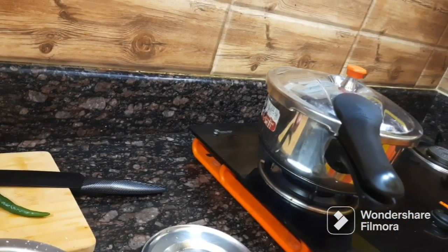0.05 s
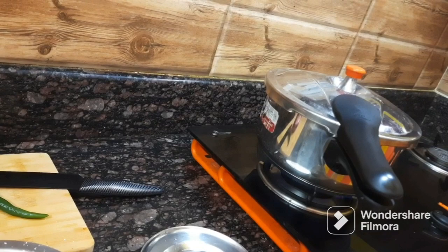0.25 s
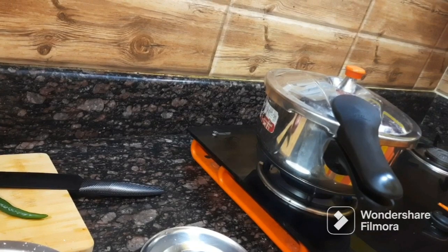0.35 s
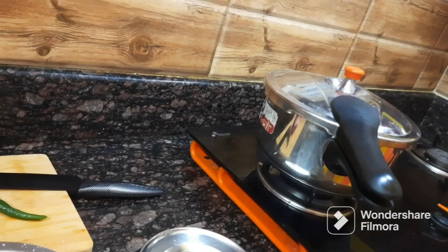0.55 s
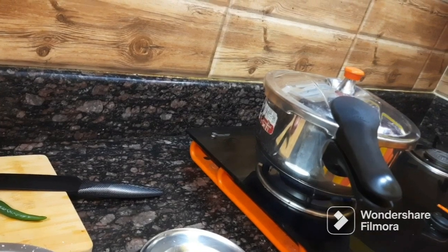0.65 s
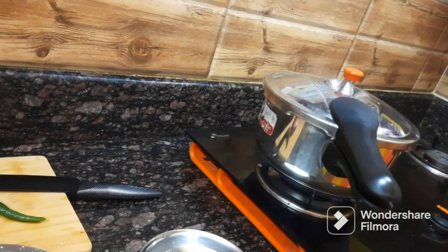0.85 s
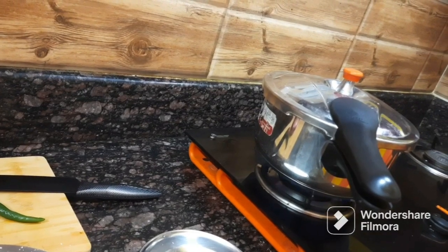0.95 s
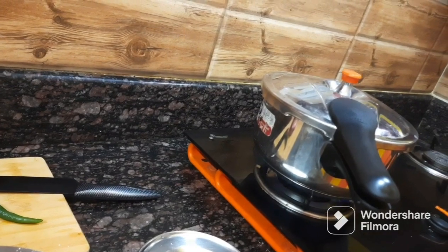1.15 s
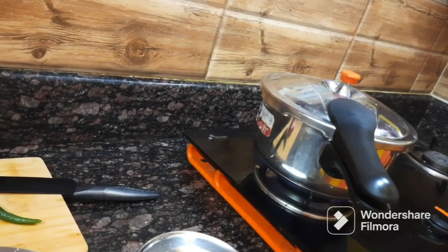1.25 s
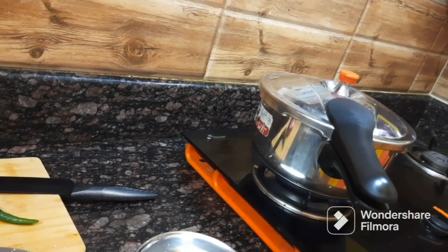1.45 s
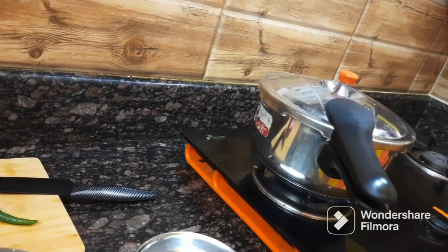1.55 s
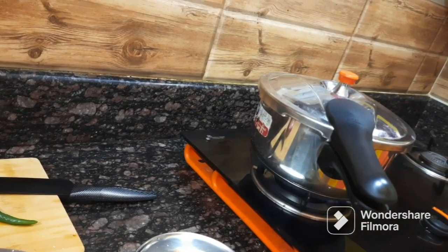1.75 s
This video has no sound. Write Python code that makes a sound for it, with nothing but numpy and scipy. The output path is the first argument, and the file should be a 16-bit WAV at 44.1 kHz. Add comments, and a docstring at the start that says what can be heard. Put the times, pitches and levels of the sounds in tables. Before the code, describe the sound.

A pressure cooker blasts out hissing steam for a second, then stops with a clank.

```python
"""A steam jet roars from the vent of a pressure cooker, on a gas burner in a small tiled kitchen.
Steam first leaks past the weight with a thin whistle; the weight lifts with a chuff, and the turbulent
jet, coloured by the vent's resonances, blows on the left microphone. The weight drops back and
excites the modes of the lid with a clank. Automatic gain control turns down under the blast and holds."""
import sys
import numpy as np
from scipy import signal
from scipy.fft import rfft, irfft
from scipy.io import wavfile
from scipy.ndimage import uniform_filter1d

SR = 44100
rng = np.random.default_rng(int(sys.argv[2]) if len(sys.argv) > 2 else 0)


def bounce(signal):
    """Save signal as a 16-bit WAV file at the path given by the first command-line argument."""
    frames = np.transpose(np.atleast_2d(signal))
    limited = np.clip(frames, -1, 1)
    pcm = np.round(limited * 32767).astype(np.int16)
    wavfile.write(sys.argv[1], SR, pcm)


N = 79380
T = np.arange(N) / SR
PLUME_PARTS = 4  # incoherent regions of the steam plume, one signal row each

# Envelope of the flow through the vent: t/s, relative level/dB
JET_FLOW = [(.05, -55), (.12, -53.5), (.2, -40), (.27, -31.5), (.3, -25.5), (.37, -19), (.45, -19),
            (.62, -18.5), (1.0, -17.5), (1.34, -17), (1.39, -31.5), (1.45, -65.5)]
# Spectrum of the turbulence: f/Hz, relative spectral level/dB
JET_SPECTRUM = [(590, -40), (1000, -20.5), (1900, -17.5), (2450, -11.5), (3650, -7), (4240, -9.5),
                (5400, -5.5), (6790, -6.5), (8060, -4), (9690, -6.5), (12000, -3.5), (13400, -5.5),
                (15000, -13), (15700, -6)]
# Resonances of vent and weight: f/Hz, bandwidth/Hz, gain/dB
VENT_MODES = [(3650, 210, -19), (5040, 1570, -0.5), (7610, 270, -6.5), (8240, 1270, -0.5),
              (14800, 650, 11.5)]
def jet():
    """Turbulence radiates broadband noise, which the resonances of vent and weight filter."""
    noise = hiss(JET_SPECTRUM, flicker_db=0.74, rate_hz=14.4, channels=PLUME_PARTS)
    resonances = sum(amp(db) * ring(noise, hz, width) for hz, width, db in VENT_MODES)
    swell_db = -0.1 * walk(7.5)
    grain_db = 1.5 * walk(400)
    return unit(noise + resonances) * amp(curve(JET_FLOW) + swell_db + grain_db)


# Leak tones: f/Hz, bandwidth per filter pass/Hz, relative peak level/dB, onset t/s, peak t/s
LEAK_TONES = [(8975, 290, -43, 0.044, .23), (4440, 180, -44, .1, 0.36), (7060, 350, -39.5, .17, 0.276)]
def leak():
    """Steam escaping past the weight whistles: narrow-band noise is heard as pitch."""
    noise = rng.standard_normal((PLUME_PARTS, N))
    fade_s = 0.051
    out = 0
    for hz, width, db, onset, peak in LEAK_TONES:
        whistle = unit(ring(ring(noise, hz, width), hz, width))
        envelope_db = curve([(onset - fade_s, -40), (onset, -18), (peak, 0), (peak + fade_s, -40)])
        out += whistle * amp(db + envelope_db)
    return out


# Spectrum of the chuff: f/Hz, relative spectral level/dB
CHUFF_SPECTRUM = [(180, -26), (300, -12.5), (850, -5.5), (1650, -7.5), (3090, -2.5), (5500, -5),
                  (7000, -33), (9000, -68)]
def chuff():
    """Sudden release of pressure as the weight lifts gives a noise burst with Gaussian flanks."""
    lift_s, rise_s, hold_s, fall_s = 0.2955, 0.027, 0.06, 0.043
    t = T - lift_s
    puff = np.exp(-(np.minimum(t, 0) / rise_s) ** 2 - (np.maximum(t - hold_s, 0) / fall_s) ** 2)
    return amp(-32.5) * puff * hiss(CHUFF_SPECTRUM, flicker_db=2.9, rate_hz=37.9, channels=PLUME_PARTS)


# Landing and bounces of the weight: t/s, relative level/dB
IMPACTS = [(1.382, -17.5), (1.42, -32), (1.45, -27)]
# Modes of lid and weight: f/Hz, relative level/dB, decay time T60/s
LID_MODES = [(585, -5, .3), (649, -2, 0.16), (720, 7, 0.045), (794, -2, 0.13), (855, -0.5, .15),
             (1342, -0.5, 0.16), (1360, -0.5, 0.19)]
def clank():
    """Each impact of the weight sets the lid in free vibration, a sum of damped modes."""
    contact_s = 0.0011
    out = np.zeros(N)
    for start, impact_db in IMPACTS:
        t = np.clip(T - start, 0, None)
        phases = rng.uniform(-0.25, 0.49, len(LID_MODES))
        modes = sum(amp(db) * np.sin(2 * np.pi * hz * t + phase) * 1000. ** (-t / t60)
                    for (hz, db, t60), phase in zip(LID_MODES, phases))
        out += amp(impact_db) * np.clip(t / contact_s, 0, 1) * modes / 4
    return out


# Envelope of the air stream: t/s, level/dB
WIND_FLOW = [(.36, -64), (.39, -43.5), (.8, -36), (1.2, -38), (1.36, -39.5), (1.4, -66)]
# Spectrum of its pressure fluctuations: f/Hz, relative spectral level/dB
WIND_SPECTRUM = [(25, -31), (60, -3.5), (130, -6.5), (300, -12), (800, -25.5), (1500, -45)]
# Strongest buffets: t/s, level above the stream/dB
WIND_BUFFETS = [(.405, 9.5), (0.431, 9), (.485, 15.5), (.63, 8), (.725, 4), (.89, 8.5), (1.039, 8),
                (1.077, 7), (1.116, 11.5), (1.15, 6), (1.271, 4)]
def wind():
    """Pseudo-sound: unsteady flow presses on the left microphone; the right one is sheltered."""
    buffet_s = 0.016
    gust_db = sum(db * np.exp(-((T - at) / buffet_s) ** 2) for at, db in WIND_BUFFETS) + 2 * walk(22)
    rumble = hiss(WIND_SPECTRUM, flicker_db=1.5, rate_hz=25, channels=2)
    return rumble * amp(curve(WIND_FLOW) + gust_db) * amp([[0], [-30]])


# Rumble and hiss of the pot: f/Hz, relative spectral level/dB
SIMMER_SPECTRUM = [(24, -26.5), (58, 1.5), (110, -3.5), (200, -3), (500, -27), (2000, -32), (4500, -18.5),
                   (6000, -39), (15500, -43)]
def simmer():
    """Simmering radiates broadband noise, which dies away once the pressure is let off."""
    end_s = 1.436
    envelope_db = curve([(end_s, -51.5), (end_s + .08, -90)])
    return hiss(SIMMER_SPECTRUM, flicker_db=3.7, rate_hz=11) * amp(envelope_db)


# Burner roar and room noise: f/Hz, relative spectral level/dB
KITCHEN_SPECTRUM = [(24, -60), (55, -16), (90, -25), (125, -24), (170, -8), (250, -10), (350, -6),
                    (420, -11), (550, -9.5), (1000, -14), (2400, -16), (4500, -23), (6000, -34.5),
                    (9000, -34.5), (14500, -43), (15500, -42)]
# Standing waves of the kitchen and a faint high hiss: f/Hz, bandwidth/Hz, level/dB
KITCHEN_BANDS = [(173, 31, -55.5), (338.5, 28, -56.5), (13600, 300, -65)]
def kitchen():
    """Burner and room noise form a diffuse field, coherent at the two microphones only in the bass."""
    coherent_below_hz = 564
    mid, side = hiss(KITCHEN_SPECTRUM, flicker_db=1.5, rate_hz=8.45, channels=2) * amp(-40.5)
    mid += sum(amp(db) * unit(ring(rng.standard_normal(N), hz, width)) for hz, width, db in KITCHEN_BANDS)
    side = signal.sosfilt(signal.butter(2, coherent_below_hz, "high", fs=SR, output="sos"), side)
    return np.array([mid + side, mid - side])


def room(x, wet_db):
    """Reverberation: reflections off the tiles follow the direct sound, decaying faster in the treble."""
    low_t60_s, treble_t60_s, crossover_hz = 0.44, 0.24, 10700
    t = T[:int(.6 * SR)]
    noise = rng.standard_normal((2, len(t)))
    low = signal.sosfiltfilt(signal.butter(2, crossover_hz, fs=SR, output="sos"), noise)
    tail = low * 1000. ** (-t / low_t60_s) + (noise - low) * 1000. ** (-t / treble_t60_s)
    tail = amp(wet_db) * tail / np.sqrt(np.sum(tail ** 2, axis=1, keepdims=True))
    direct = np.array([np.roll(x, 5), x])  # arrives 5 samples later on the left
    return direct + signal.fftconvolve(x[None], tail, axes=1)[:, :N]


def amp(db):
    """Amplitude ratio of a level in dB."""
    return 10 ** (np.asarray(db) / 20)


def unit(x):
    """Normalisation to rms 1."""
    return x / np.sqrt(np.mean(x ** 2))


def curve(rows):
    """Linear interpolation of (t/s, value) rows."""
    return np.interp(T, *np.array(rows).T)


def walk(rate_hz):
    """Smoothed random steps give a slow fluctuation of rms 1."""
    hold = int(SR / rate_hz)
    steps = np.repeat(rng.standard_normal(N // hold + 1), hold)
    return unit(uniform_filter1d(uniform_filter1d(steps, hold), hold)[:N])


def ring(x, hz, width):
    """Second-order resonator with gain 1 at its centre."""
    return signal.lfilter(*signal.iirpeak(hz, hz / width, fs=SR), x)


def hiss(spectrum, flicker_db, rate_hz, channels=1):
    """Shaped noise with independent amplitude modulation in each third-octave band."""
    hz, db = np.array(spectrum, float).T
    f = np.fft.rfftfreq(N, 1 / SR) + 1e-3
    shape_db = np.interp(np.log(f), np.log(hz), db, -80, db[-1])
    shaped = rfft(rng.standard_normal((channels, N))) * amp(shape_db)
    band_number = 3 * np.log2(f / 20)
    bands = (irfft(shaped * np.clip(1 - abs(band_number - k), 0, 1), N) for k in range(30))
    return unit(sum(band * amp(flicker_db * walk(rate_hz)) for band in bands))


def scene():
    """Superposition of the reverberant cooker, the background and the wind."""
    plume = (jet() + leak() + chuff()) / np.sqrt(PLUME_PARTS)  # incoherent parts add in power
    cooker = sum(room(part, wet_db=4) for part in plume) + room(clank(), wet_db=-0.5)
    balance = amp([[1.1], [-1.1]])  # louder on the left
    return (amp(-2) * cooker + simmer() + kitchen()) * balance + wind()


def record(dry):
    """Compression without release: the gain falls and holds; an abrupt stop and a low-pass follow."""
    knee_db, slope, attack_s = -24, 0.86, 0.15
    stop_s, cutoff_hz = 1.767, 15720
    level_db = 10 * np.log10(uniform_filter1d(np.mean(dry ** 2, axis=0), int(.03 * SR)) + 1e-12)
    target_db = np.minimum.accumulate(-slope * np.clip(level_db - knee_db, 0, None))
    pole = np.exp(-1 / (attack_s * SR))
    gain_db = signal.lfilter([1 - pole], [1, -pole], target_db)
    gate = np.clip((stop_s - T) / 0.00074, 0, 1)
    low_pass = signal.ellip(16, .3, 80, cutoff_hz, fs=SR, output="sos")
    return signal.sosfilt(low_pass, dry * amp(gain_db) * gate)


dry = scene()
out = record(dry)
bounce(out)
```